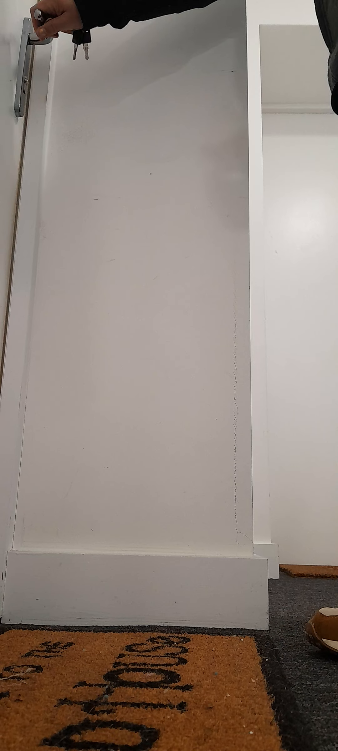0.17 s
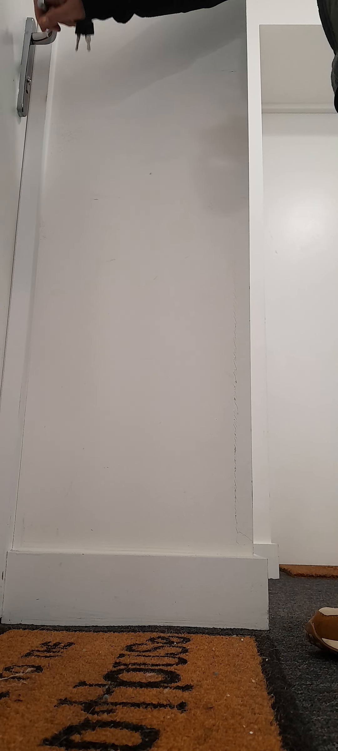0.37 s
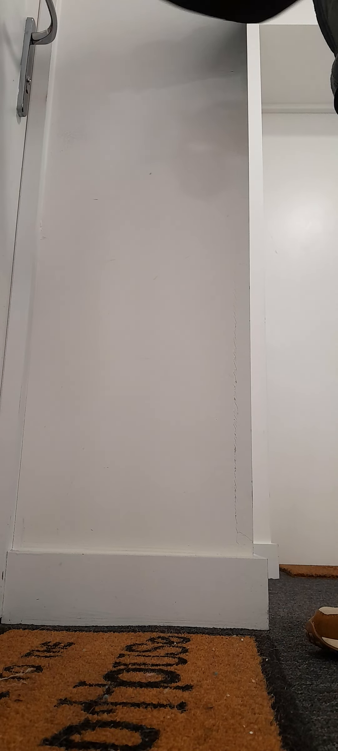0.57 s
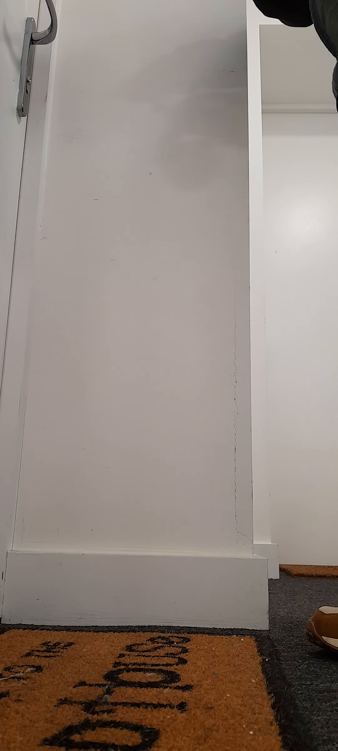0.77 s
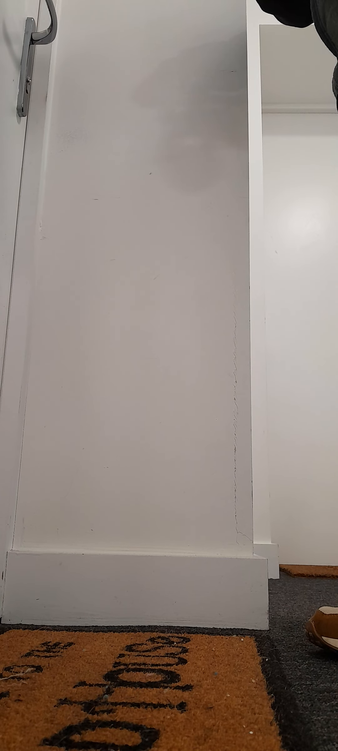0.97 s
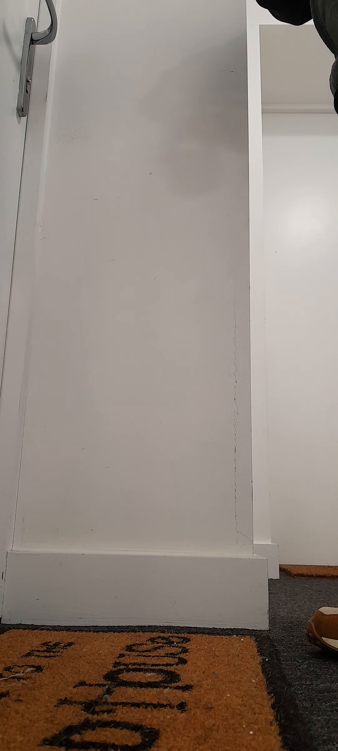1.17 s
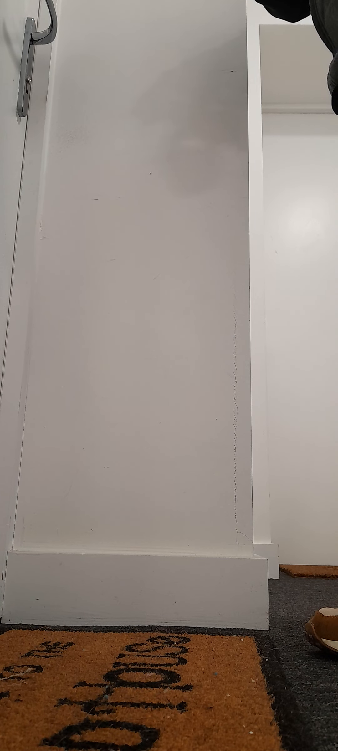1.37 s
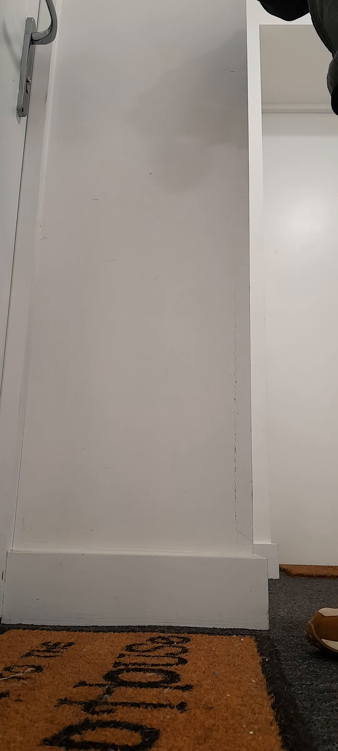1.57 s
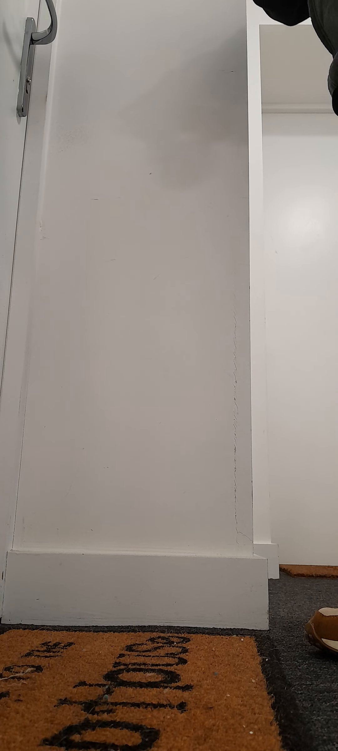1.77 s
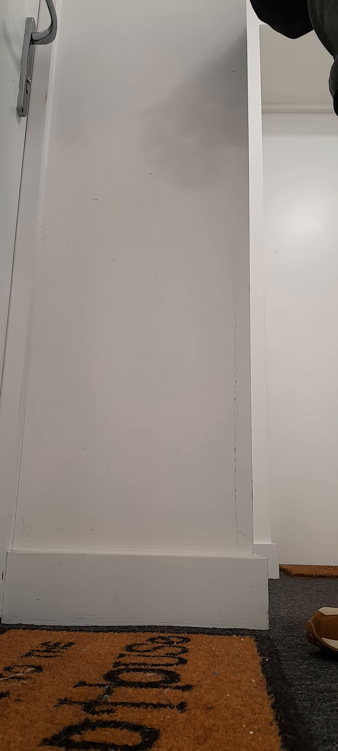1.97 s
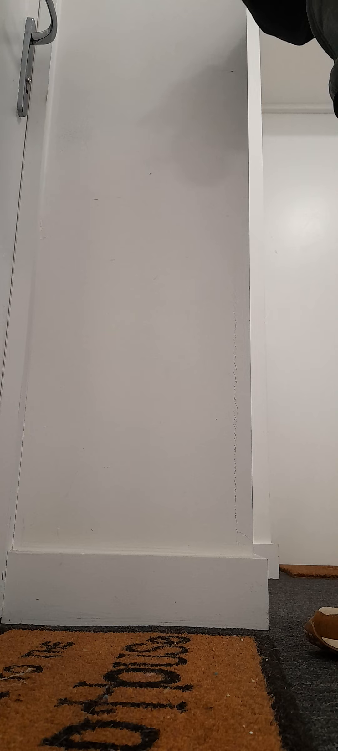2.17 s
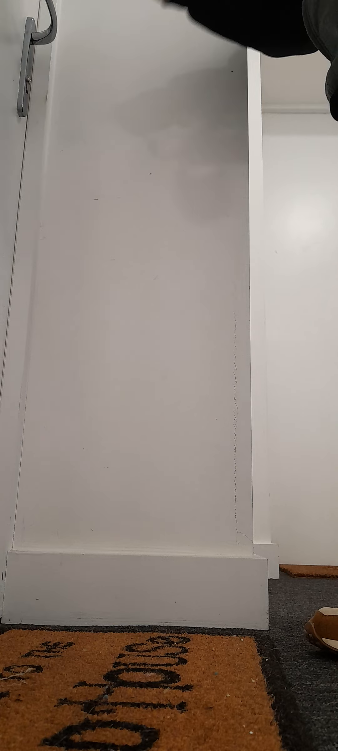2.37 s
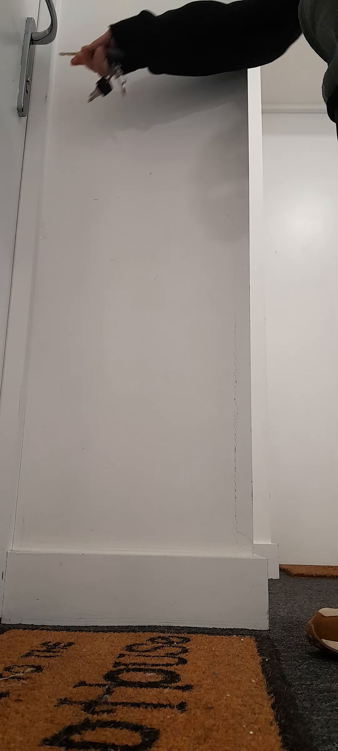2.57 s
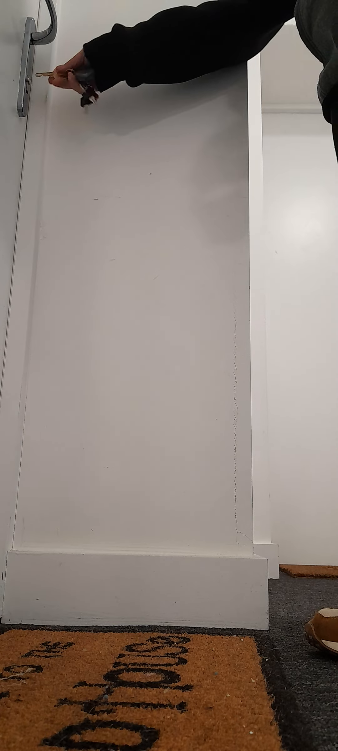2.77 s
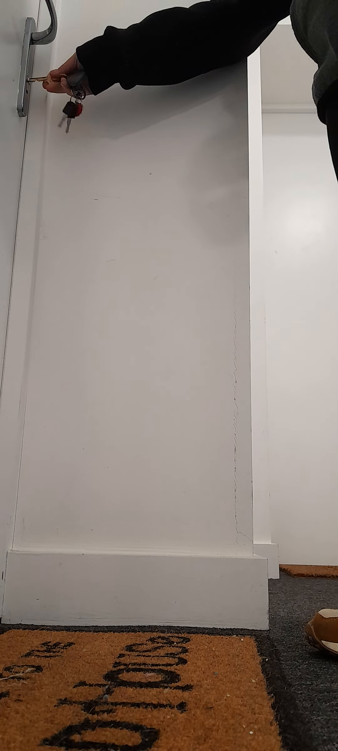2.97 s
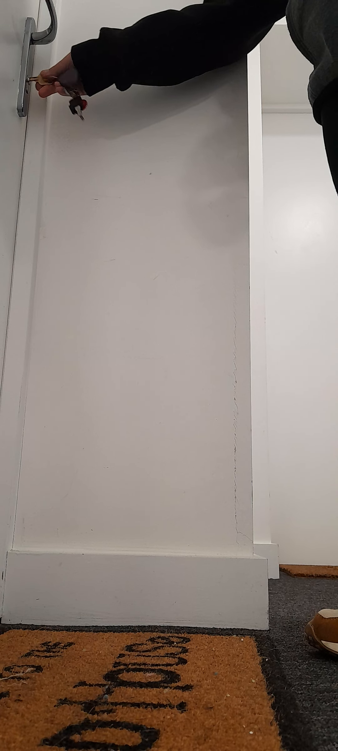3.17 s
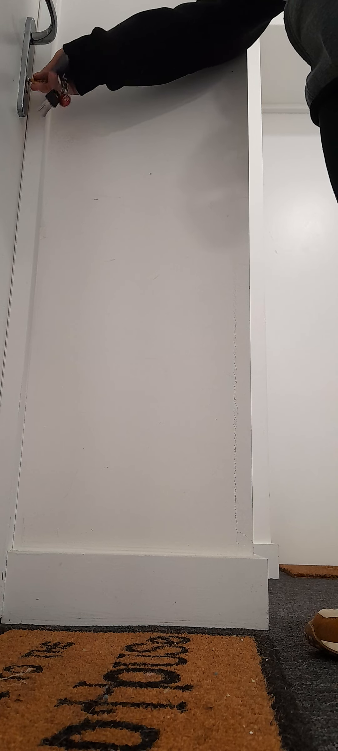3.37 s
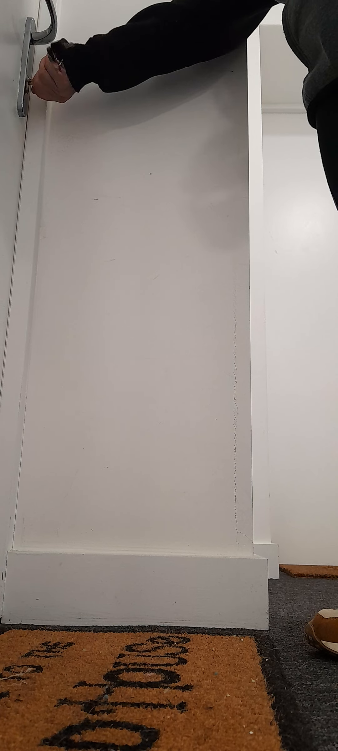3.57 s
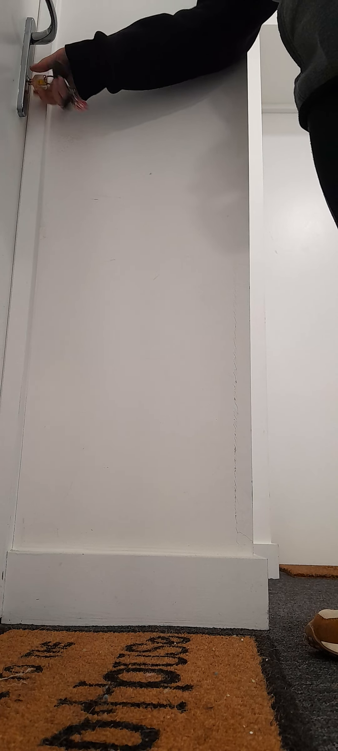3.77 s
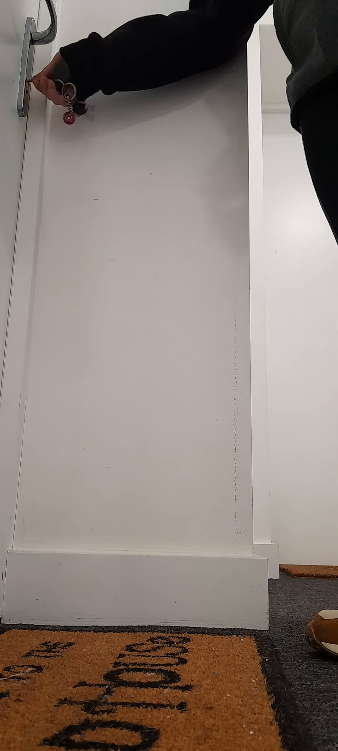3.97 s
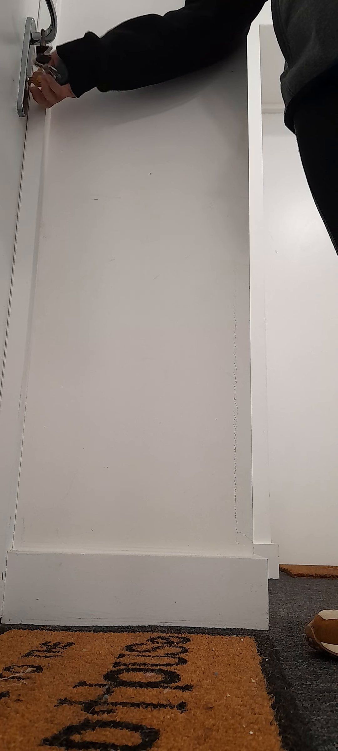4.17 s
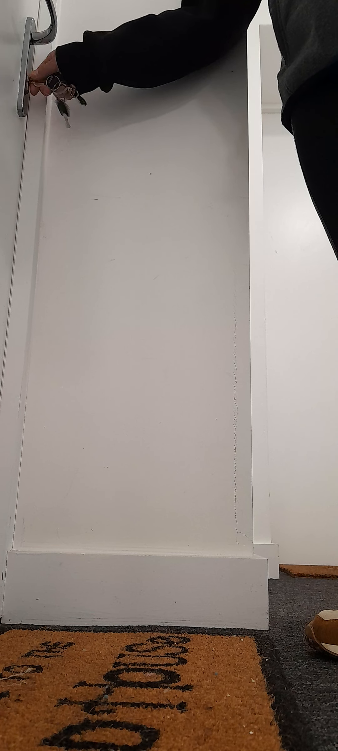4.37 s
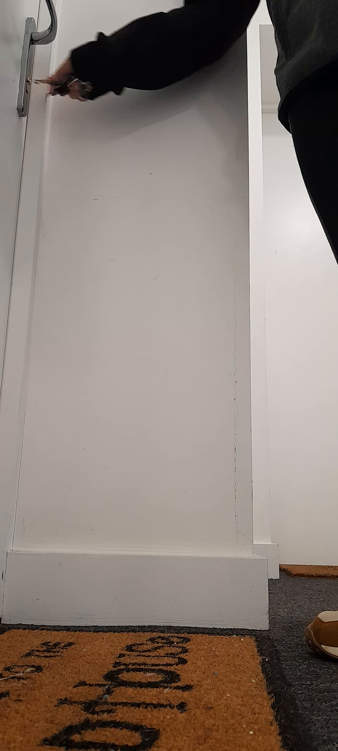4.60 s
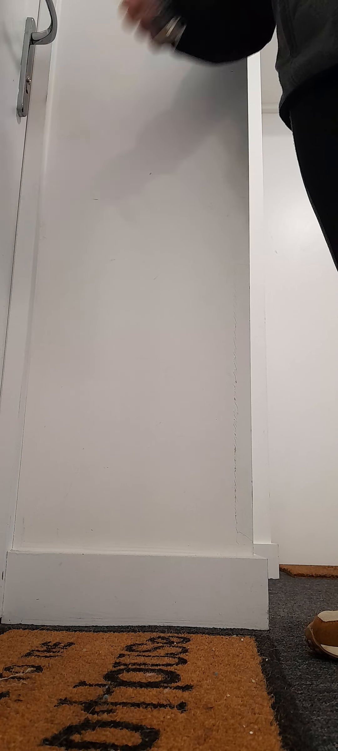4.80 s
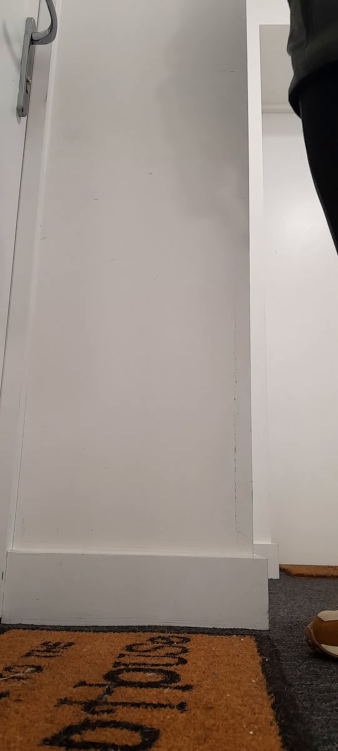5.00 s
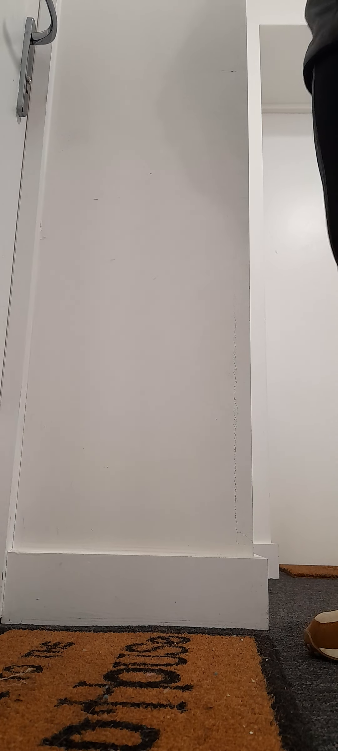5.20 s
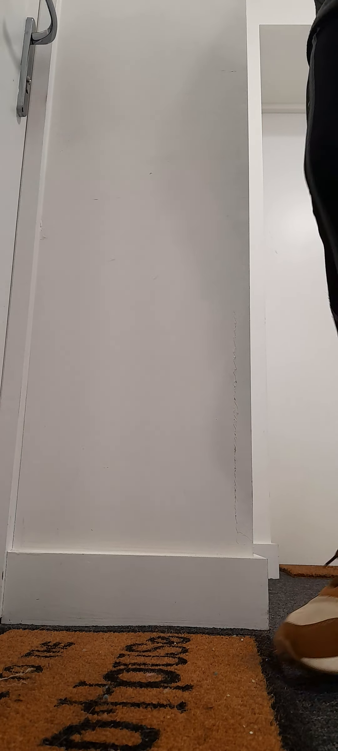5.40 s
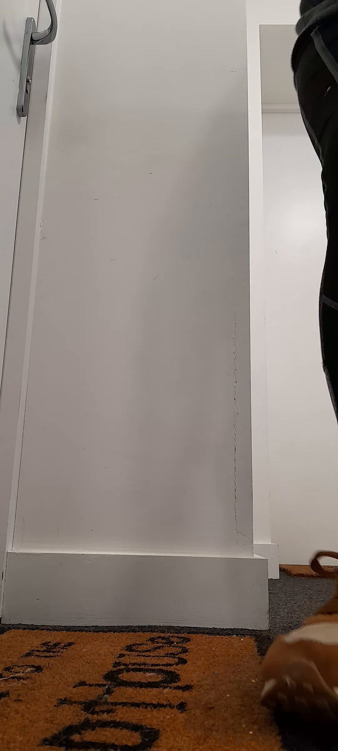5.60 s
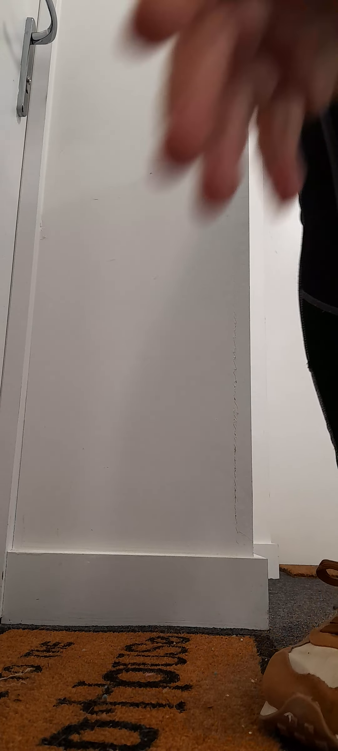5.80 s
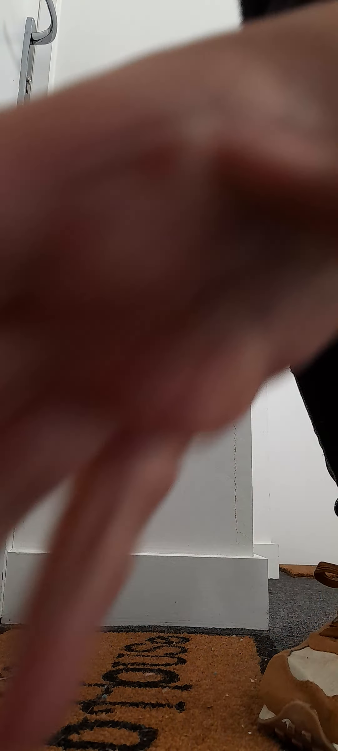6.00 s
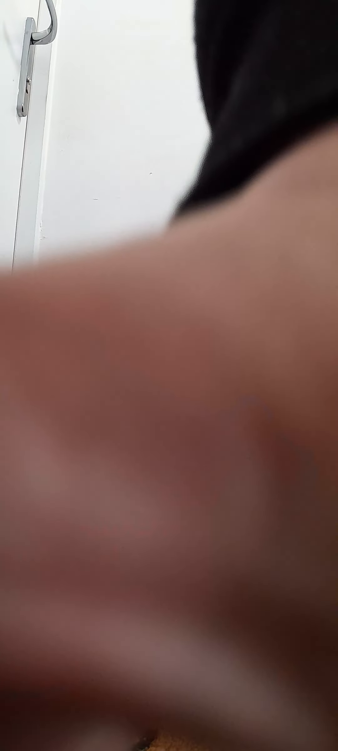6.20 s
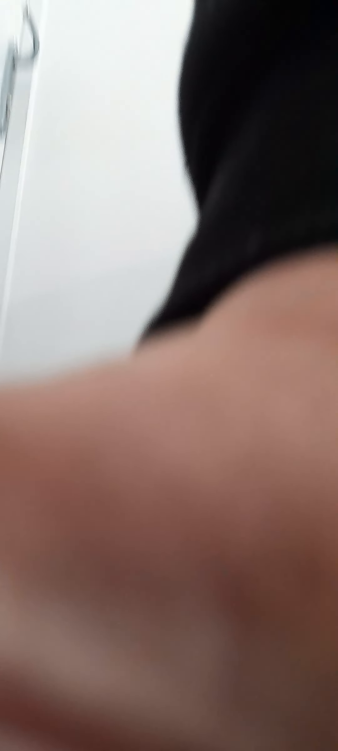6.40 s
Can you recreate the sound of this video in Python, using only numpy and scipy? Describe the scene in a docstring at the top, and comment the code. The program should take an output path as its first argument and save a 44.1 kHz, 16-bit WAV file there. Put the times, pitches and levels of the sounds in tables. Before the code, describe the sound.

A small, hard-walled hallway heard very close, with a short reverberant tail and a faint bassy noise floor. From 0 to 0.5 s a door drags and scrapes in its frame, then bangs shut: loud wooden and steel latch knocks, strongest around 0.2 to 0.45 s, with low booms. A cloth rustle and faint key ticks follow near 0.5 to 0.8 s, then near silence until 1.8 s. Keys jangle brightly in dense irregular clinks from 1.8 to 2.6 s, thinning out by 2.8. From 3.0 to 3.9 s a key clicks and rubs in the lock, with a crisp snap at 3.5. At 3.98 s the bolt strikes over, loud and metallic. Small clicks continue to 4.6 s, keys clink at 4.8 and jangle sharply at 5.1 to 5.4. A soft dull footfall on a mat comes at 5.55, clothes swish around 5.7 to 6.2, and light key clinks end near 6.4.

```python
"""A door bangs shut in a small hard-walled hallway; keys jangle, one works in the lock, the bolt is thrown,
the keys jangle once more, a shoe lands on a mat and clothes swish past.
Keys and lock parts are noise cracks filtered by resonances and a synthetic hallway; shaking and rubbing are
trains of random tiny contacts through the same filters. Thuds and pings are decaying sines with blurred pitch;
clothes, mat, booms and background are noise with set spectra."""
import sys
import numpy as np
from scipy import signal
from scipy.fft import rfft, irfft, next_fast_len
from scipy.io import wavfile
from scipy.ndimage import uniform_filter1d

SR = 44100
rng = np.random.default_rng(int(sys.argv[2]) if len(sys.argv) > 2 else 0)


def persist_wave(psi):
    """Save psi, clipped to +-1, as 16-bit WAV."""
    counts = np.round(np.clip(psi, -1, 1) * 32767).astype(np.int16)
    wavfile.write(sys.argv[1], SR, np.atleast_2d(counts).T)


N = 284400
SIZE = 32768  # samples in one short sound
T = np.arange(SIZE) / SR

# latch, pins and bolt knock on the door:
# (time [s], level [dB], wood [dB], steel [dB], knock pitch [Hz])
LOCK_KNOCKS = [(0.091, -14.5, -13, -43, 651), (0.207, -8.5, -18.5, -17, 949), (0.28, -4, -11.5, -15.5, 571),
               (0.391, -12, -19, -15, 985), (0.442, -3, -30, -23, 961), (0.477, -10, -21.5, -17, 1006),
               (2.993, -35.5, -23, -24.5, 719), (3.06, -14.5, -17.5, -24.5, 820),
               (3.096, -20, -22, -18, 770), (3.192, -16, -19, -27, 640), (3.238, -17.5, -13.5, -15.5, 777),
               (3.293, -16, -20, -20, 778), (3.385, -14.5, -25, -22, 636), (3.491, -18, -18, -26.5, 830),
               (3.53, -17, -37.5, -5.5, 920), (3.714, -31, -31.5, -23, 810), (3.75, -30.5, -17, -27, 802),
               (3.883, -21, -21, -13.5, 789), (3.968, -4.5, -27, -18.5, 1610),
               (3.983, -7, -37.5, -16, 1246), (3.989, -4.5, -32, -16, 1250),
               (4.006, -9.5, -18.5, -16, 1266), (4.257, -29, -28, -36, 670), (4.357, -28, -23, -16, 660),
               (4.384, -23.5, -26.5, -17.5, 815), (4.557, -12.5, -16.5, -27.5, 890)]
# resonances of the door: (frequency [Hz], width [Hz], level [dB])
DOOR_MODES = [(112, 8, -0.5), (204, 4.8, 10.5), (220.7, 10, 5), (352.4, 7.5, 2), (500, 2.6, -10.5),
              (585, 35, -1.5), (781, 14, 2.5), (922.6, 23, 3.5), (946, 10, -6), (1222, 6.3, 5),
              (1354, 29, -10.5), (1438, 16, -19)]
# spectrum of low booms and pushed air: (frequency [Hz], level [dB per Hz])
BOOM_SPECTRUM = [(25, -35.5), (45, -9), (66, -0.5), (85, 4.5), (115, -1), (170, -18.5), (500, -53.5),
                 (2000, -88)]


def amp(db):
    """Decibels to gain."""
    return 10 ** (np.asarray(db) / 20)


def unit(x):
    """Scale to rms 1."""
    return x / np.sqrt(np.mean(x ** 2) + 1e-20)


def energy(x):
    """Scale a sound of SIZE samples to energy 1 (mean over channels)."""
    return unit(x) / np.sqrt(SIZE)


def along(points, hz):
    """Interpolate (Hz, value) points on a log frequency axis."""
    f, v = np.transpose(points)
    return np.interp(np.log(hz + 1), np.log(f), v)


def add(track, s, sound):
    """Mix a sound in at time s."""
    start = max(round(s * SR), 0)
    part = track[..., start:start + sound.shape[-1]]
    part += sound[..., :part.shape[-1]]


def filtered(x, response):
    """Multiply the spectrum of x by a function of frequency."""
    m = next_fast_len(N + SR // 2)
    hz = np.fft.rfftfreq(m, 1 / SR)
    return irfft(rfft(x, m) * response(hz), m)[..., :N]


def colour(points):
    """Minimum-phase response with the gain of (Hz, dB) points, by folding the cepstrum."""
    gain = amp(along(points, np.fft.rfftfreq(SIZE, 1 / SR)))
    cepstrum = irfft(np.log(gain))
    cepstrum[1:SIZE // 2] *= 2
    cepstrum[SIZE // 2 + 1:] = 0
    return np.exp(rfft(cepstrum))


def ringing(modes, scatter_db, detune):
    """A bare click plus second-order resonances, randomly excited and detuned at each call."""
    hz = np.fft.rfftfreq(SIZE, 1 / SR)
    response = np.ones(len(hz), complex)
    draws = rng.standard_normal((len(modes), 2))
    for (centre, width, db), (size, shift) in zip(modes, draws):
        band = 1j * hz * width
        tuned = centre * (1 + detune * shift)
        response += amp(db + scatter_db * size) * band / (tuned ** 2 - hz ** 2 + band)
    return response


def hallway(near_db, wet_db, pan_db, lag):
    """Stereo spectrum of one contact of energy 1: the crack, close walls, and the tail of the room."""
    # reverberation: (frequency [Hz], t60 [s])
    room_t60 = [(60, 1), (200, 0.46), (500, 0.58), (1200, 0.41), (3000, 0.38), (8000, 0.2), (15000, 0.12)]
    crack = energy(rng.standard_normal(SIZE) * np.exp(-T / .001)) + .5 * (T == 0)
    late = int(rng.uniform(0, 2 * lag + 1))  # samples; the hand moves, so the right port's lag varies
    ports = np.array([crack, np.pad(crack, (late, 0))[:SIZE]])
    direct = energy(ports * amp([[pan_db / 2], [-pan_db / 2]]))
    near = energy(rng.standard_normal((2, SIZE)) * np.exp(-T / .016) * (1 - np.exp(-T / .001)))
    hz, t, z = signal.stft(rng.standard_normal((2, SIZE)), SR, nperseg=256)
    decay = amp(-60 * t / along(room_t60, hz)[:, None])
    tail = signal.istft(z * decay, SR, nperseg=256)[1][:, :SIZE]
    tail = energy(tail * (1 - np.exp(-T / 0.017)))
    return rfft(energy(direct + amp(near_db) * near + amp(wet_db) * tail))


def grains(count, rate, spread_db):
    """Random tiny contacts of uneven size and either sign, rate a second on average, scaled to rms 1."""
    present = rng.random(count) < rate / SR
    sign = rng.choice([-1, 1], count)
    return unit(present * sign * amp(spread_db * rng.standard_normal(count)))


def sounded(contacts, response):
    """Play a train of contacts through a stereo response, scaled to energy 1."""
    impulse = unit(irfft(response)) / np.sqrt(SIZE)
    return signal.fftconvolve(contacts[None], impulse, axes=1)[:, :N]


def noise(spectrum):
    """Stereo noise of rms 1 with the given spectrum."""
    return unit(filtered(rng.standard_normal((2, N)), lambda hz: amp(along(spectrum, hz))))


def strokes(rows, rise_s, t60_s):
    """Gain per sample for (s, length s, dB) movements that rise, hold and die away; powers add."""
    t = np.arange(N) / SR
    gains = []
    for s, length, db in rows:
        rise = np.clip((t - s) / rise_s, 0, 1)
        gains.append(rise * amp(db - 60 * np.maximum(t - s - length, 0) / t60_s))
    return np.linalg.norm(gains, axis=0)


def background():
    """A faint steady noise floor, strongest in the bass."""
    # (frequency [Hz], level [dB per Hz])
    floor_spectrum = [(25, -5), (65, 4), (130, -5), (300, -14.5), (600, -22), (2000, -27), (8000, -27.5),
                      (16000, -28)]
    return amp(-71.0) * noise(floor_spectrum)


def clothes():
    """Sleeve and trouser legs rustle as shaped noise, and the same movements push a little air."""
    # clothes brush against each other: (time [s], length [s], level [dB])
    leg_rows = [(0.0, 0.11, -56), (0.5, 0.16, -46), (4.9, 0.15, -70), (5.67, 0.12, -56),
                (5.77, 0.084, -45.5), (5.89, 0.084, -53), (6.12, 0.32, -61)]
    # arm lifts the keys, reaches for the lock, draws back: (time [s], length [s], level [dB])
    arm_rows = [(1.8, 0.18, -62.5), (1.96, 0.27, -58), (2.4, 0.52, -61), (4.8, 0.58, -72.5)]
    # spectrum of the trouser legs: (frequency [Hz], level [dB per Hz])
    leg_spectrum = [(88, -49), (150, -15.5), (448, -11), (649, -1), (1120, -4.5), (1450, -1), (1900, -12),
                    (2270, -9), (11900, -27), (13700, -33), (16000, -42.5)]
    # spectrum of the sleeve: (frequency [Hz], level [dB per Hz])
    sleeve_spectrum = [(60, -12), (180, -6.5), (330, 3), (450, -8), (620, -1.5), (900, -5.5), (1500, -14),
                       (4000, -26), (16000, -30)]
    rumble_db = -7.5  # pushed air relative to the sleeve; legs push 8 dB less
    legs = strokes(leg_rows, rise_s=0.028, t60_s=0.64)
    arm = strokes(arm_rows, rise_s=0.094, t60_s=0.73)
    rustle = legs * noise(leg_spectrum) + arm * noise(sleeve_spectrum)
    return rustle + amp(rumble_db) * (arm + amp(-8) * legs) * noise(BOOM_SPECTRUM)[0]


def footfall():
    """Mat fibres crush softly under the shoe: one swell of dull noise."""
    # a sole presses into the mat: (time [s], length [s], level [dB])
    press = [(5.53, 0.053, -42)]
    # spectrum of the mat: (frequency [Hz], level [dB per Hz])
    mat_spectrum = [(59, -41), (100, -1.5), (215, -1), (452, -11.5), (872, -5), (1360, -8), (1800, -16),
                    (2470, -16.5), (4570, -24.5), (5300, -24), (16000, -43)]
    return strokes(press, rise_s=0.025, t60_s=0.5) * noise(mat_spectrum)


def thuds():
    """Heavy pushes swell into the low resonances of door and hallway; the wood of each knock booms on."""
    # the leaf is pushed in its frame, a foot loads the floor:
    # (time [s], level [dB], frequency [Hz], rise [s], t60 [s])
    pushes = [(0.0, -23.5, 94.8, 0.0023, 0.53), (0.024, -21.5, 225.6, 0.025, 0.26),
              (0.185, -13.5, 71, 0.036, 0.23), (0.306, -10.5, 61.7, 0.051, 0.32),
              (0.3, -10.5, 112, 0.024, 0.099), (0.439, -23, 84.6, 0.02, 0.72),
              (3.215, -30, 61.2, 0.054, 0.43), (3.82, -39.5, 70.6, 0.043, 0.6),
              (4.564, -25.5, 70.9, 0.037, 0.72), (5.158, -41.5, 77.6, 0.035, 0.55),
              (5.582, -44.5, 78.8, 0.045, 0.62), (6.321, -50, 72, 0.027, 0.5)]
    chatter = .06  # leaf chatters in its frame: line width / pitch, before the blur is smoothed
    boom_db, boom_rise_s, boom_t60_s = -6.5, 0.015, .7
    out = np.zeros(N)
    for s, db, hz, rise, t60 in pushes:
        swell = np.sin(np.pi / 2 * np.minimum(T / rise, 1)) ** 2
        swell = swell * amp(-60 * np.maximum(T - rise, 0) / t60)
        blur = np.cumsum(rng.standard_normal(SIZE)) * np.sqrt(2 * np.pi * chatter * hz / SR)
        phase = 2 * np.pi * hz * T + uniform_filter1d(blur, size=400)
        add(out, s, amp(db) * swell * np.sin(phase))
    booms = [(s, boom_rise_s, db + wood_db + boom_db) for s, db, wood_db, steel_db, hz in LOCK_KNOCKS]
    return out + strokes(booms, boom_rise_s, boom_t60_s) * noise(BOOM_SPECTRUM)[0]


def scraping():
    """Latch, key and bolt stick and slip as random grains; the door gives their friction its voice."""
    # door drags in its frame, key works in the lock: (time [s], length [s], level [dB])
    rubs = [(0.0, 0.21, -36), (0.16, 0.36, -27.5), (0.45, 0.04, -27.5), (3.02, 0.041, -47.5),
            (3.19, 0.025, -30), (3.245, 0.055, -39.5), (3.37, 0.016, -39.5), (3.48, 0.05, -31.5),
            (3.74, 0.084, -46), (3.94, 0.022, -47), (4.04, 0.04, -49.5), (4.2, 0.12, -49.5),
            (4.56, 0.22, -48)]
    # metal slides on metal: (time [s], length [s], level [dB], brightness [dB])
    slides = [(0.149, 0.052, -19.5, -4), (0.263, 0.039, -17.5, 0), (0.444, 0.032, -16, -4),
              (3.237, 0.05, -27.5, -39.5), (3.526, 0.009, -18, 2.5), (3.981, 0.032, -18.5, -9),
              (4.582, 0.077, -38.5, 1), (4.628, 0.0083, -23, -1.5)]
    # friction colour: (frequency [Hz], gain [dB])
    friction_tone = [(50, -21), (200, 5.5), (350, 4), (1100, 2.5), (2000, -2.5), (4000, -14.5),
                     (6000, -26.5), (9000, -44.5), (16000, -47)]

    def door():
        """Friction heard through door and hallway, drawn afresh."""
        voice = colour(friction_tone) * ringing(DOOR_MODES, scatter_db=1.5, detune=0.0029)
        return voice * hallway(near_db=5.5, wet_db=-16, pan_db=1.5, lag=12)

    slips = grains(N, rate=450, spread_db=6)
    out = sounded(strokes(rubs, rise_s=0.0097, t60_s=0.26) * slips, door())
    for s, length, db, bright_db in slides:
        stroke = np.clip(np.minimum(T, length - T) / 0.0036, 0, 1)
        edge = colour([(1200, 0), (3500, bright_db + 8.0), (12000, bright_db)])
        add(out, s, amp(db) * sounded(stroke * grains(SIZE, rate=7100, spread_db=4.5), door() * edge))
    return out


def knocks():
    """Steel parts of the lock graze, then strike home, and the door leaf radiates the blow."""
    # sprung latch and pins snap into place: (time [s], level [dB], frequency [Hz])
    snaps = [(0.2095, -5, 2500), (0.4445, -5, 1300), (3.5345, -16, 2500), (4.558, -17, 1000)]
    hard_db, hard_grows = 10.5, 0.05  # crack emphasis at level 0 dB; dB more per dB of level
    graze_db = -3.5  # relative to the knock's level; the blow itself sits 17 dB above that level
    out = np.zeros((2, N))
    for s, db, wood_db, steel_db, hz in LOCK_KNOCKS:
        wood = [(40, wood_db - 1.5), (110, wood_db + 6), (195, wood_db + 4), (330, wood_db + 9.5)]
        pitch = [(hz / 2, -13), (hz, -8), (hz * 1.5, -14)]
        steel = [(4000, steel_db - 3), (7000, steel_db - 10.5), (10500, steel_db - 20),
                 (15000, steel_db - 34.5)]
        door = colour(wood + pitch + steel) * ringing(DOOR_MODES, scatter_db=3, detune=.004)
        crack_db = hard_db + hard_grows * db  # a hard blow puts more of its energy into the first crack
        space = hallway(near_db=11.5 - crack_db, wet_db=3.5 - crack_db, pan_db=-1.5, lag=4)
        add(out, s, amp(db + 17) * energy(irfft(door * space)))
        graze_space = hallway(near_db=2, wet_db=-7, pan_db=-1, lag=13)
        graze = amp(db + graze_db) * energy(irfft(door * graze_space))
        add(out, s - rng.uniform(0.0033, 0.011), graze)
    for s, db, hz in snaps:
        add(out, s, amp(db + 3) * np.sin(2 * np.pi * hz * T) * np.exp(-T * hz))
    return out


def pings():
    """One partial of a free-hanging piece outlasts the click: a decaying sine with a blurred pitch."""
    # a key, the ring or the bolt sings out: (time [s], frequency [Hz], level [dB], t60 [s])
    partials = [(0.39, 2840, -20.5, 0.16), (2.083, 3820, -27, 0.068), (2.555, 8100, -22, 0.042),
                (2.771, 13500, -50, .4), (3.536, 2450, -32, 0.36), (3.79, 13800, -51, 0.33),
                (3.992, 1326, -13.5, 0.094), (4.701, 2300, -34, 0.13), (5.165, 2340, -24, 0.2),
                (5.328, 4840, -24, 0.069)]
    out = np.zeros((2, N))
    for s, hz, db, t60 in partials:
        decay = amp(-60 * T / t60) * (1 - np.exp(-T / 0.00046))
        # the piece buzzes against the ring, which blurs its pitch
        blur = np.cumsum(rng.standard_normal((2, SIZE)), axis=1) * np.sqrt(2 * np.pi * 110 / SR)
        phase = 2 * np.pi * hz * T + uniform_filter1d(blur, size=60, axis=1)
        add(out, s, amp(db) * decay * np.sin(phase))
    return out


def key_ring(count=12):
    """Modes shared by the bunch, plus partials of whichever key is touched; neighbours damp them quickly."""
    # resonances of the bunch: (frequency [Hz], width [Hz] before the 70 Hz minimum, level [dB])
    bunch = [(3470, 57.2, -3), (5530, 540, 2), (7140, 36, -11.5), (8160, 96, -12), (7870, 77, 9),
             (10500, 70, 8.5), (13570, 120, 13.5), (13900, 64, -9.5)]
    shared = [(hz, max(width, 70), db) for hz, width, db in bunch]
    own = [(hz, 170, 2) for hz in rng.uniform(3500, 15500, count)]
    return ringing(shared + own, scatter_db=3, detune=.015)


def jingle():
    """Each of four keys of the shaken bunch chatters against its neighbours as a train of contacts."""
    # the bunch is shaken: (time [s], length [s], level [dB])
    shakes = [(0.55, 0.24, -59.5), (1.335, 0.063, -64), (1.79, 0.07, -47.5), (1.865, 0.058, -39),
              (1.96, 0.13, -41), (2.17, 0.31, -54), (2.43, 0.14, -49.5), (2.765, 0.015, -44.5),
              (3.03, 0.19, -60.5), (3.19, 0.061, -41), (3.41, 0.16, -52.5), (3.62, 0.4, -59.5),
              (3.97, 0.17, -45), (4.22, 0.047, -57), (4.31, 0.1, -46.5), (4.56, 0.15, -49.5),
              (4.99, 0.05, -61), (5.087, 0.1, -36.5), (5.28, 0.049, -36), (5.52, 0.55, -64),
              (6.31, 0.14, -48)]
    # contact colour: (frequency [Hz], gain [dB])
    contact_tone = [(200, -35.5), (1200, -10), (2400, 2), (4000, 3.5), (6500, -2.5), (8200, 7.5),
                    (9800, 1.5), (14000, 1), (16000, 7.5)]
    out = np.zeros((2, N))
    shake = strokes(shakes, rise_s=0.01, t60_s=0.3)  # the keys start swinging, and settle
    for key in range(4):
        space = hallway(near_db=-2.5, wet_db=-14.5, pan_db=-0.5, lag=8.3)
        response = colour(contact_tone) * key_ring() * space
        out += sounded(shake * grains(N, rate=70, spread_db=5), response)
    return amp(-3) * out


def clinks():
    """Loose keys ring high and bright; keys held in the fingers give a lower clack. Each one rebounds."""
    # keys strike each other; body is high when the fingers grip the key:
    # (time [s], level [dB], body [dB], ring [dB])
    strikes = [(0.7178, -31, -4, -15), (0.8062, -43.5, -11, -19), (1.284, -53.5, -23.5, 0),
               (1.4985, -52.5, -13.5, -8), (1.8084, -33, -15, -16), (1.836, -32, -4.5, -9),
               (1.8647, -16.5, -19.5, -5), (1.8897, -22, -19.5, -40), (1.917, -18, -42, -30),
               (1.9609, -21.5, -10.5, -9), (1.9927, -19.5, -8.5, -12), (2.0188, -27, 1, -14),
               (2.082, -20, -16.5, -6), (2.1624, -14.5, -5.5, -17.5), (2.1844, -18.5, -26, -9),
               (2.2479, -21, -1.5, -19), (2.3135, -31, -1, -20), (2.3505, -23, -2.5, -20),
               (2.39, -27.5, 3, -18), (2.5062, -28, -12.5, -14), (2.5275, -25.5, -16.5, -15),
               (2.5561, -24.5, -27, -5), (2.619, -37, -7.5, -31), (2.7521, -35, -17, -4),
               (2.7691, -29.5, -23, -15), (2.9492, -42, -19, -4), (3.1867, -41, -13, -25),
               (3.2385, -24, -6, -32), (3.493, -25, -18, -7), (3.5092, -19, -12, 5),
               (3.7855, -29.5, -8, -11), (3.858, -39, -14, 0), (3.8844, -32, -14, -9),
               (4.1061, -25.5, -21, -15), (4.1161, -35, 1, -20), (4.2222, -40.5, -3, -4),
               (4.3499, -25.5, 16, -1), (4.3869, -35, -28, -11), (4.4583, -35, -29, 20),
               (4.58, -26.5, -23, -7), (4.7618, -19.5, -8.5, -6.5), (4.7707, -20, -23, -4),
               (4.85, -13.5, -18, -17), (4.986, -36, -18.5, -2), (5.0858, -14.5, -31, -17.5),
               (5.1354, -23, -15, -3), (5.1626, -18, -8.5, -13), (5.1713, -21.5, 13, -19),
               (5.185, -18.5, 5, -22), (5.2955, -27, -1, -9), (5.3271, -13, -3, -22), (5.3407, -23, 1, -21),
               (5.3934, -32.5, -5, -26), (5.7422, -30.5, -12, -1), (5.879, -40, -24, -21),
               (6.2202, -30, -9.5, -22), (6.3007, -30, -10, -19), (6.3243, -25.5, -9, -16),
               (6.3893, -30.5, -18, -12), (6.4077, -27.5, -11, -22)]
    top_db, grip_damps = -22.5, 0.63  # top partials; dB they lose per dB of body
    crisp_db, crisp_grows = 2.5, 0.12  # crack over near reflections at level 0 dB; dB more per dB of level
    touch_db, rebound_db = -17.5, -11.5  # relative to the clink
    out = np.zeros((2, N))
    for s, db, body_db, ring_db in strikes:
        shimmer_db = top_db - grip_damps * body_db
        crack_db = crisp_db + crisp_grows * db
        body = [(200, body_db - 15), (1300, body_db - 7), (2300, body_db + 1), (3900, body_db + 1.5),
                (5000, body_db / 2 - 6.5)]
        ring = [(6800, -11.5), (8150, ring_db + 8.5), (9400, -15), (13500, shimmer_db)]
        space = hallway(near_db=-crack_db, wet_db=-10 - crack_db, pan_db=2.5, lag=6.5)
        hit = amp(db + 17.5) * energy(irfft(colour(body + ring) * key_ring() * space))
        add(out, s - rng.uniform(.002, .008), amp(touch_db) * hit)  # a light touch comes first
        add(out, s, hit)
        add(out, s + rng.uniform(.0015, .009), amp(rebound_db + rng.normal(0, 2)) * hit)
    return out * amp([[.5], [-.5]])  # 1 dB towards the left


def scene():
    """All sources at two close microphone ports, which hear the bass nearly alike."""
    # stereo width: (frequency [Hz], gain of the side signal [dB])
    side_gain = [(60, -30), (150, -16.5), (280, -16.5), (550, -4.5), (1200, 4.5), (2500, -1), (16000, 1)]
    # balance: (frequency [Hz], left minus right [dB])
    balance = [(60, 1.9), (130, -1.5), (280, -1), (550, -7), (1100, -2), (2200, -1), (4400, 2),
               (16000, 2.5)]
    keys = clinks() + pings() + jingle()
    door = knocks() + scraping() + thuds()
    left, right = keys + door + clothes() + footfall() + background()
    mid = (left + right) / 2
    side = filtered((left - right) / 2, lambda hz: amp(along(side_gain, hz)))
    ports = np.array([mid + side, mid - side])
    return filtered(ports, lambda hz: amp(np.outer([.5, -.5], along(balance, hz))))


def record(dry):
    """The microphone drops the deepest bass, clips at full scale and keeps nothing above its band limit."""
    low_cut_hz, top_hz = 32, 15850
    heard = filtered(dry, lambda hz: 1 - 1 / (1 + (hz / low_cut_hz) ** 6))
    return filtered(np.clip(heard, -1, 1), lambda hz: 1 / (1 + (hz / top_hz) ** 200))


dry = scene()
out = record(dry)
persist_wave(out)
```